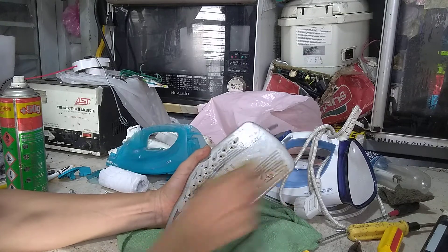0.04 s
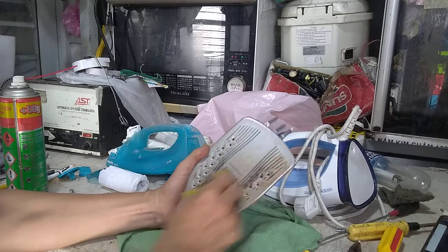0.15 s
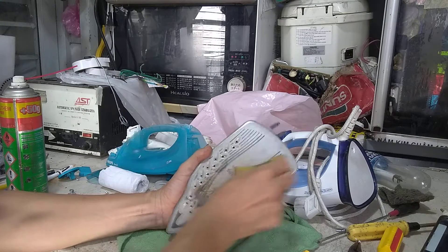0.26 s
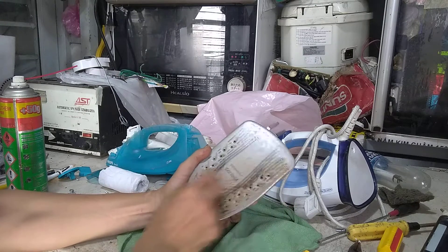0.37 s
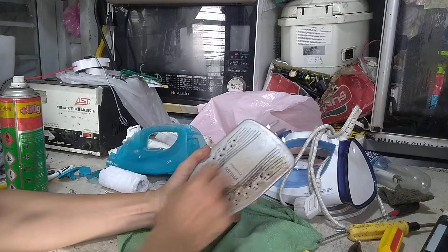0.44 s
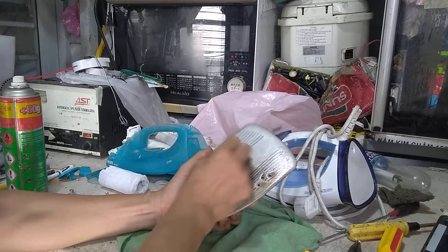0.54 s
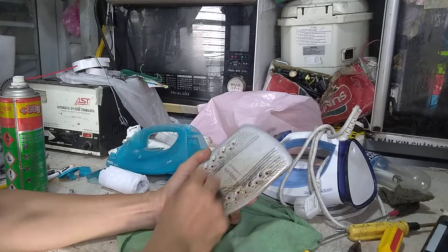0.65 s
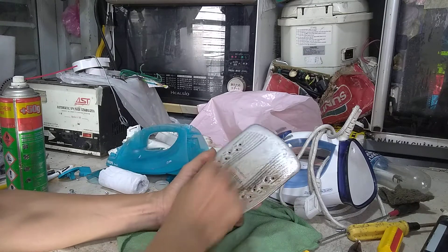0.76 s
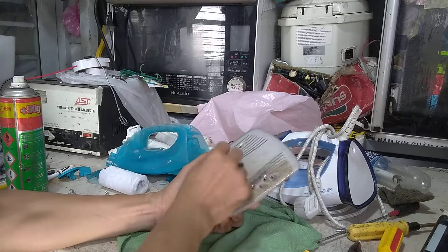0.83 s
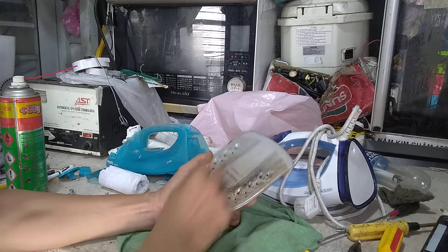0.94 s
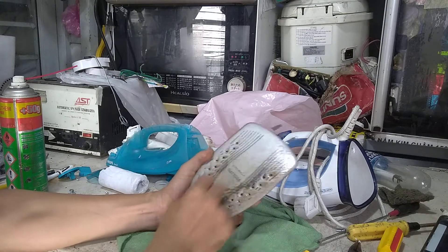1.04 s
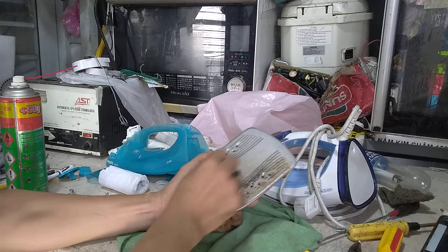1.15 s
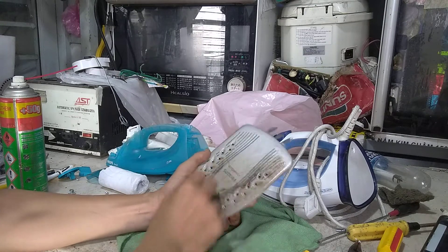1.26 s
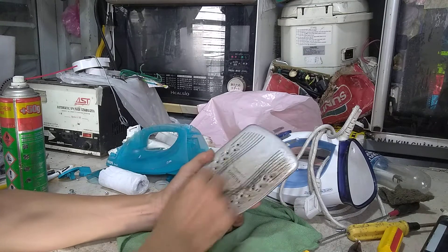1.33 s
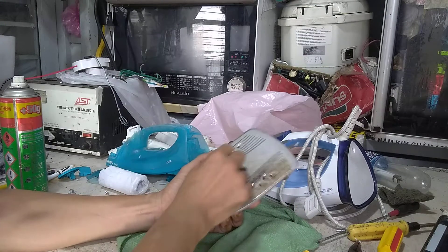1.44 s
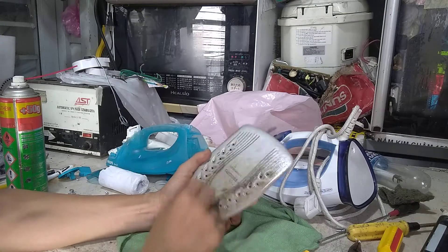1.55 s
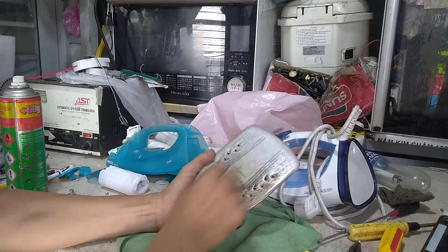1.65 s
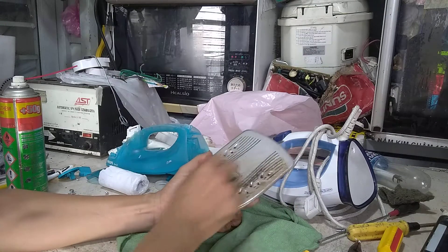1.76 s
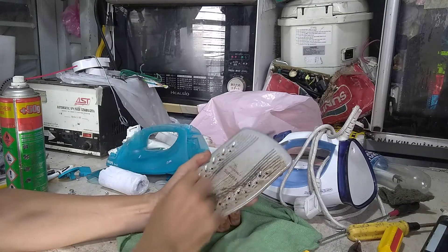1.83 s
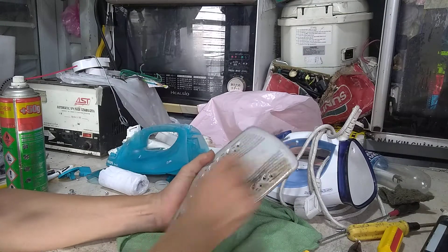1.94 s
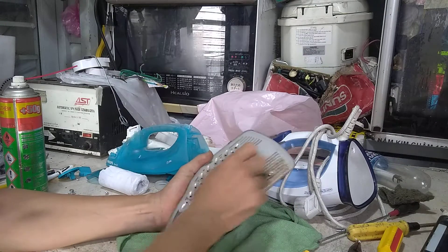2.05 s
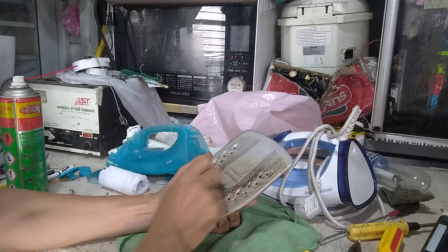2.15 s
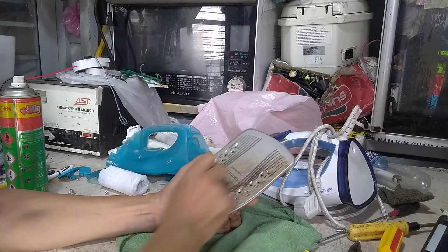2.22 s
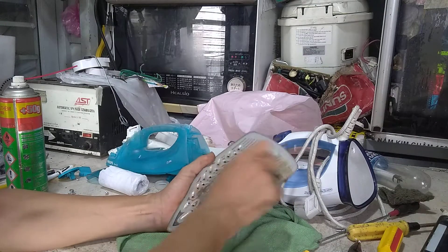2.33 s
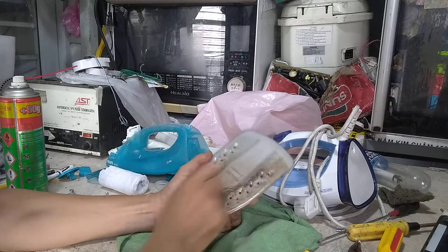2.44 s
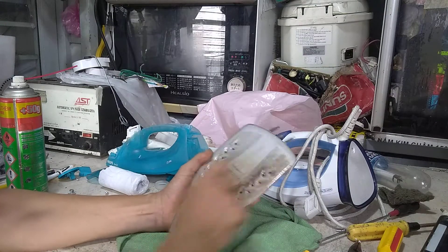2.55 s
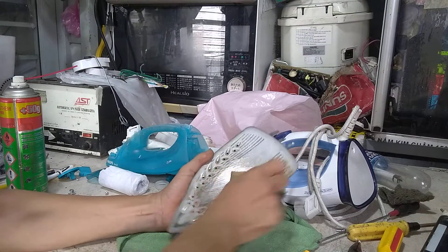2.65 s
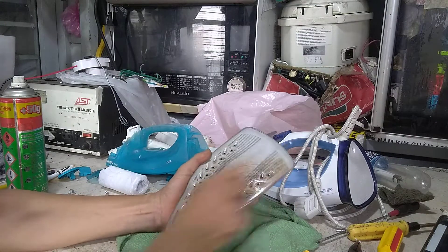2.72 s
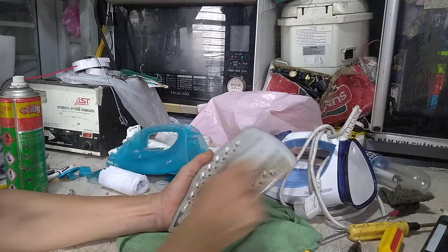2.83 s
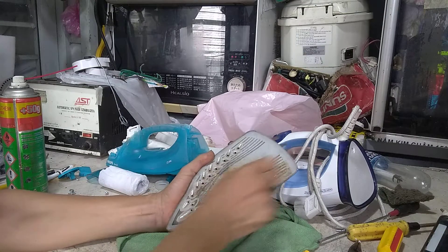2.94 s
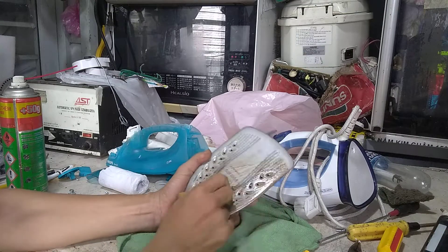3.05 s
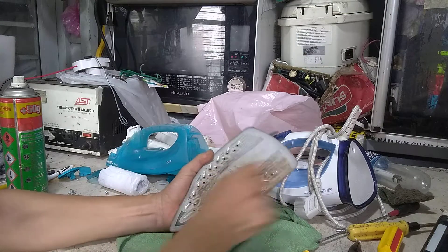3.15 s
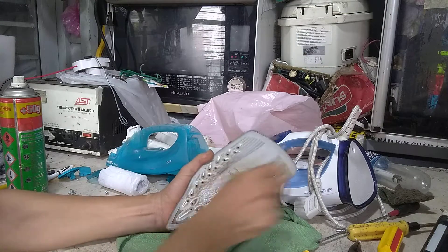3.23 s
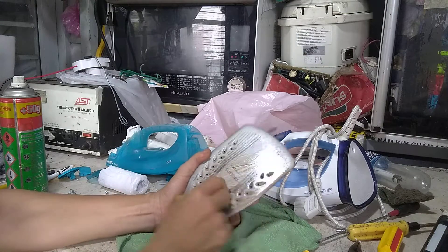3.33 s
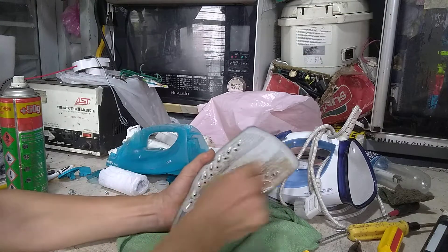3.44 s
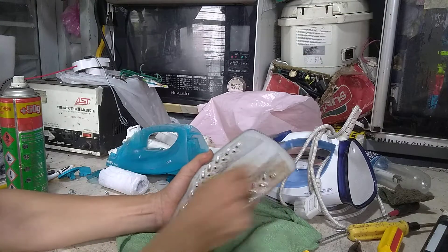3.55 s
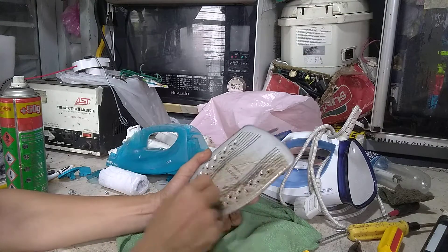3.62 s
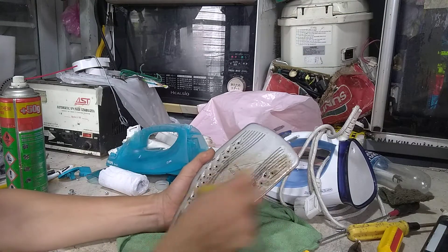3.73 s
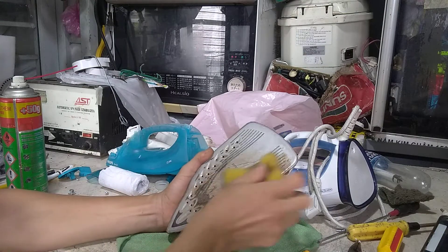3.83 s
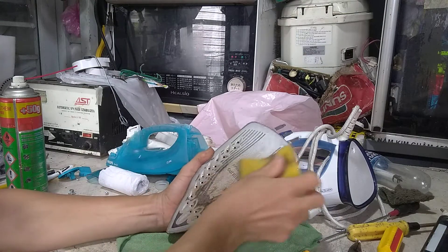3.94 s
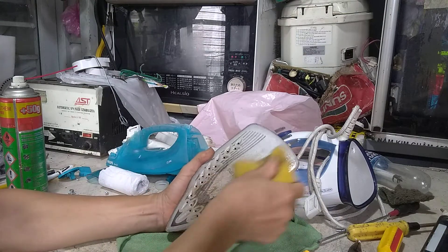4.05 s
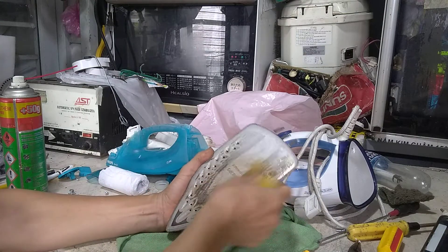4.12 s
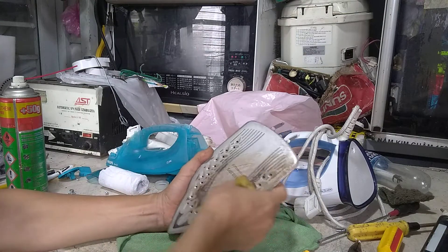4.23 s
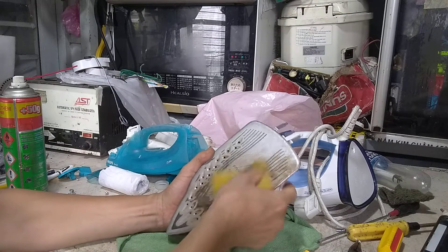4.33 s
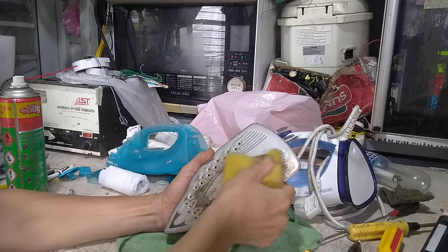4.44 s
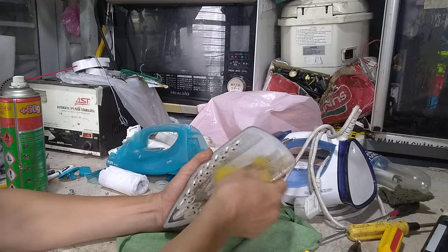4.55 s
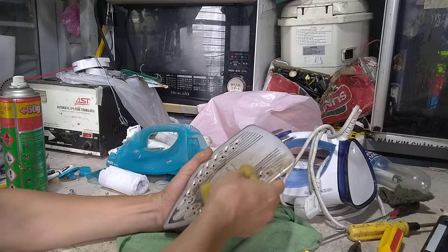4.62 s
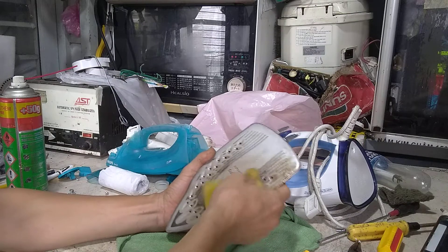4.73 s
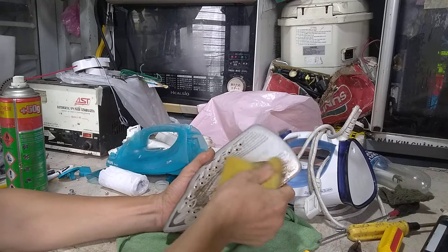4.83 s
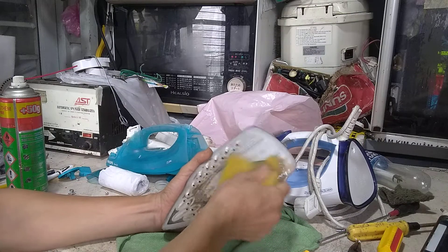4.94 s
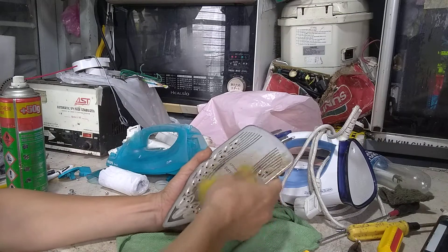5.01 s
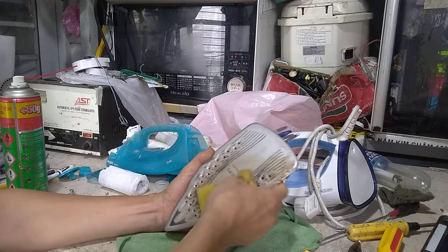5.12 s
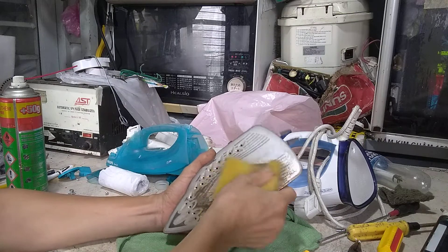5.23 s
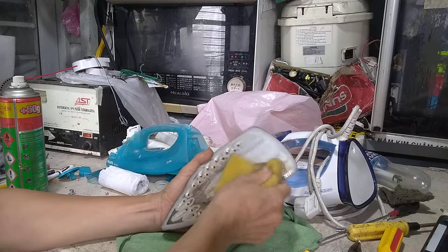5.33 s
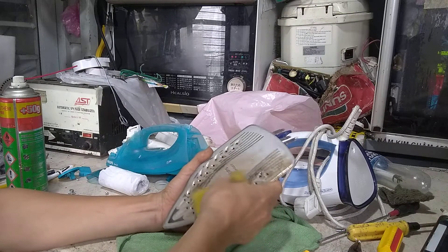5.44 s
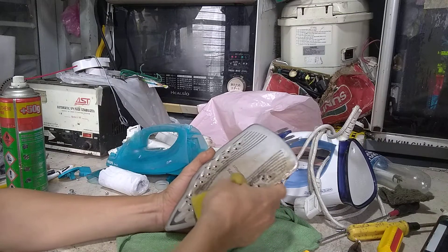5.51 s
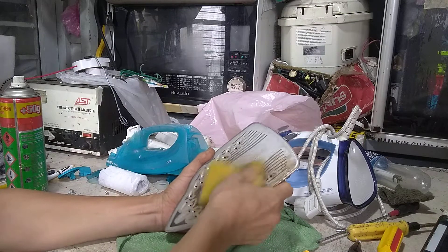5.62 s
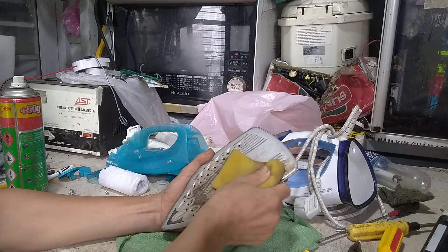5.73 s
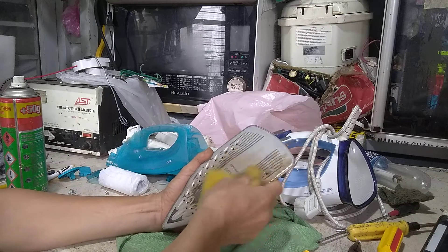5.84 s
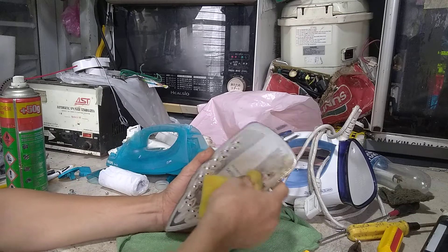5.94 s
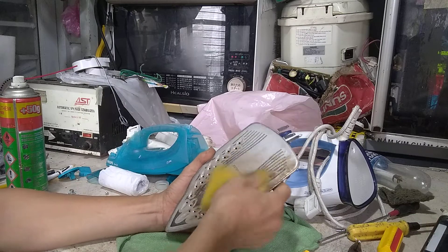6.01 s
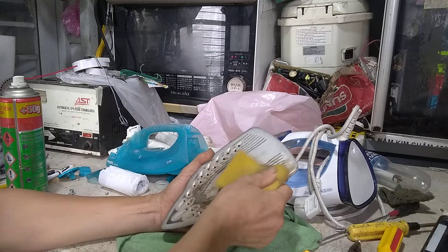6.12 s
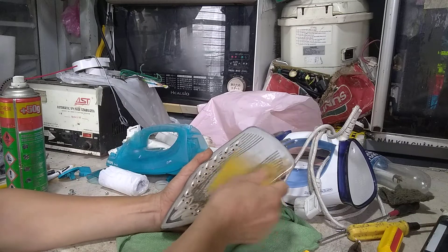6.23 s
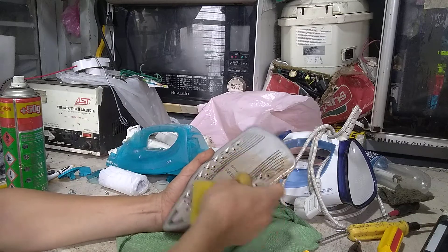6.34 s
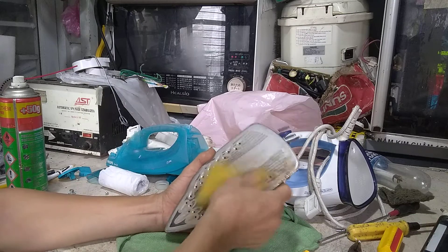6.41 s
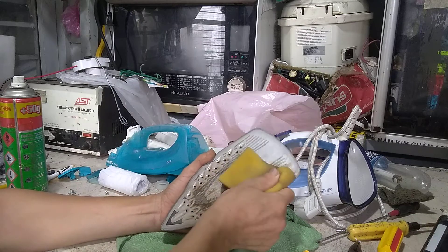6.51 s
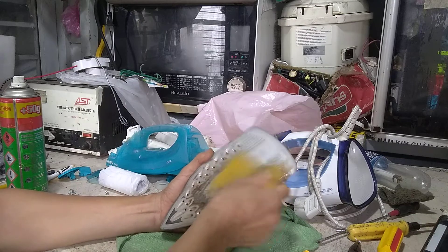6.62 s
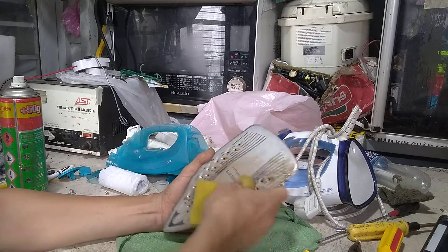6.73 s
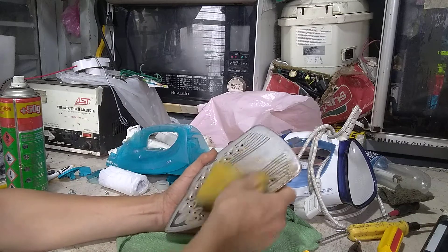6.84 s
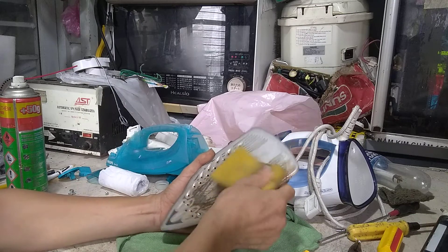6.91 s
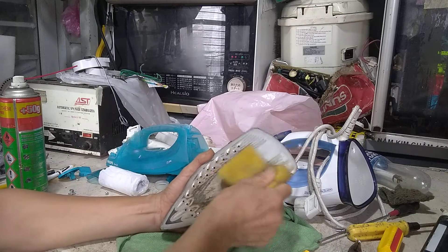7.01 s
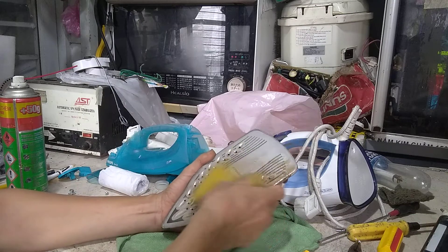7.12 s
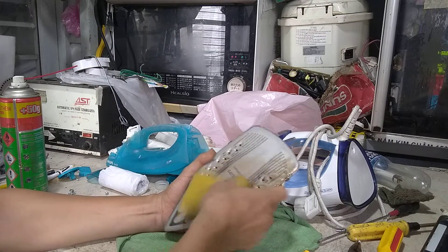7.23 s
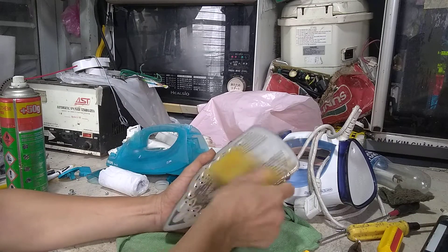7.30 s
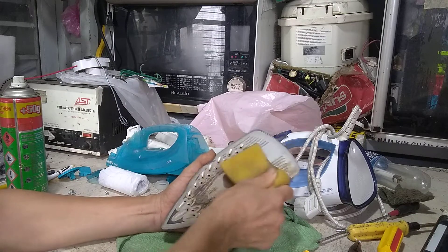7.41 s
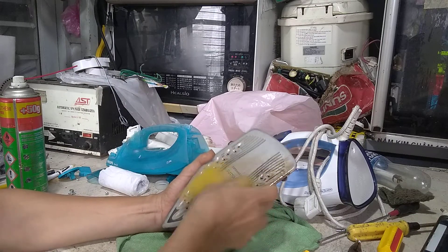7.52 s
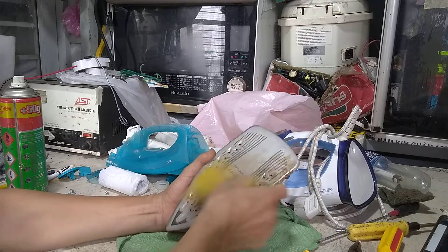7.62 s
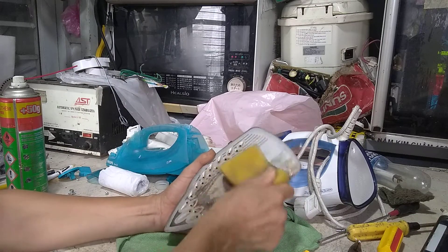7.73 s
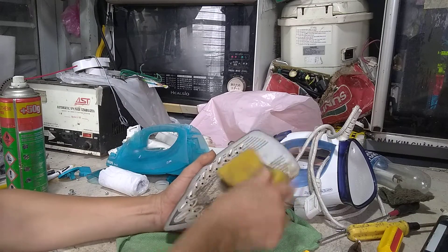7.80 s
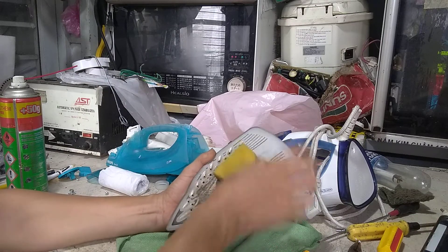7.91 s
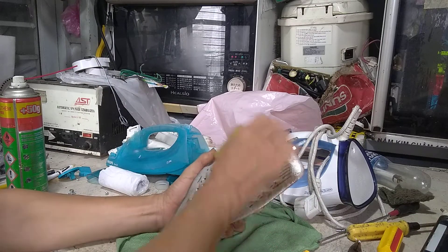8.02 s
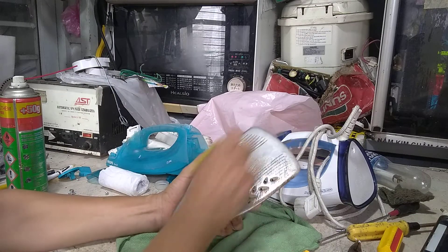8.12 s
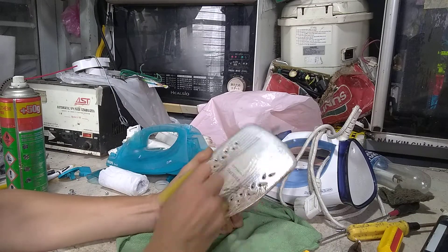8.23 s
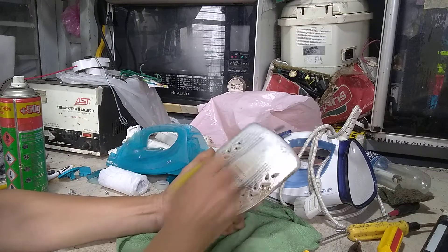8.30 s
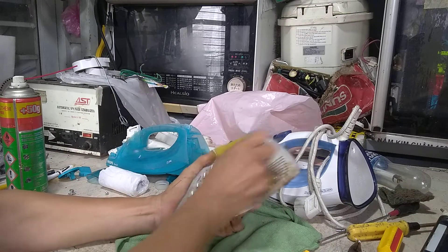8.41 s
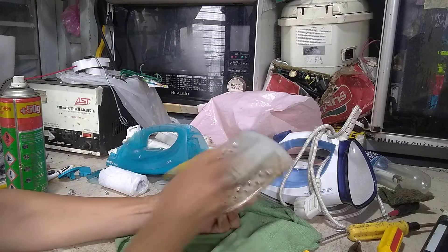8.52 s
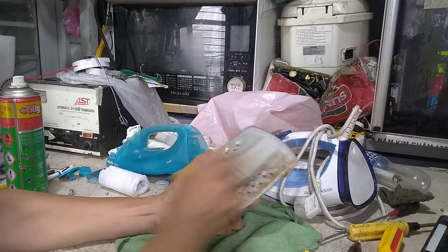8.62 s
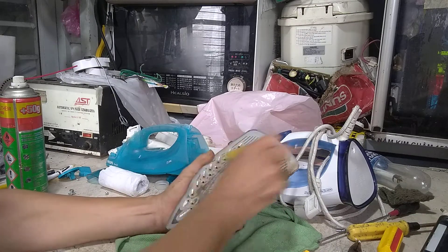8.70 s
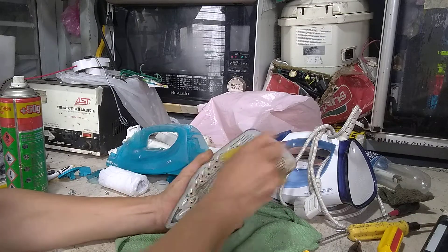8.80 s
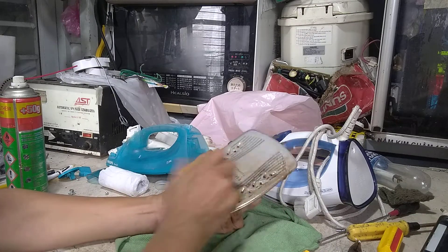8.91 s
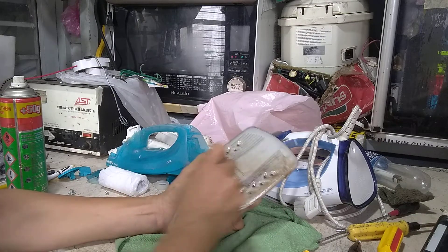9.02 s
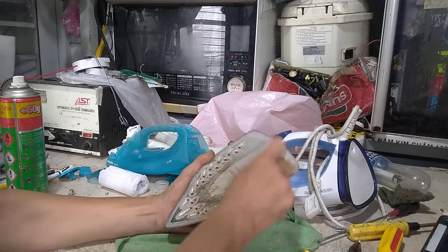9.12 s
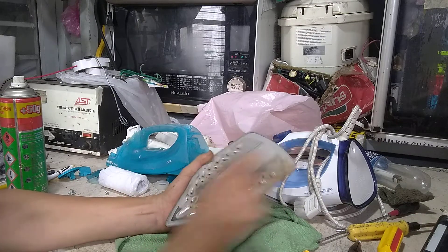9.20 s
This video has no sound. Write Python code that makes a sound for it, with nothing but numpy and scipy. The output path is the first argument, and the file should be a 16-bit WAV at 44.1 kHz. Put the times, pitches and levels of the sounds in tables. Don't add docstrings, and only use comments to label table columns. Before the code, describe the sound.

Close scrubbing of a metal soleplate held in the hand with a wet scouring sponge. Bright, hissy swipes open sharply, then spaced short dabs with faint brushing and one squeak. After a pause come longer, regular back-and-forth soapy strokes with low rumble and dull knocks, then another gap and a few hard dabs. Dry cluttered workbench, very quiet room, small stereo recorder.

```python
import sys
import numpy as np
from scipy import signal
from scipy.fft import rfft, irfft
from scipy.io import wavfile
from scipy.ndimage import uniform_filter1d

SR = 44100
rng = np.random.default_rng(int(sys.argv[2]) if len(sys.argv) > 2 else 0)


def boost(x):
    u = np.asarray(x, float) / 20
    return 10 ** u


def output_pcm(signal):
    pcm = np.clip(np.atleast_2d(signal).T, -1, 1) * 32767
    wavfile.write(sys.argv[1], SR, np.round(pcm).astype(np.int16))


N = 408366
THINNED_BELOW_HZ = 5050


def rms_one(x):
    return x / np.sqrt(np.mean(x ** 2) + 1e-20)


def in_time(rows):
    seconds, *columns = np.transpose(rows)
    return [np.interp(np.arange(N) / SR, seconds, column) for column in columns]


def edge(x, hz, kind, order=2):
    return signal.sosfilt(signal.butter(order, hz, kind, fs=SR, output="sos"), x)


def drift(rate_hz):
    slow = rms_one(edge(rng.standard_normal(N // 32 + 2), 32 * rate_hz, "low"))
    return np.interp(np.arange(N) / 32, np.arange(len(slow)), slow)


def resonate(x, modes, patchy_db=None, sign=-1):
    out = 0
    for k, (hz, width, db) in enumerate(modes):
        radius = np.exp(-np.pi * width / SR)
        feedback = [1, -2 * radius * np.cos(2 * np.pi * hz / SR), radius ** 2]
        gain = boost(db + patchy_db * drift(13)) if patchy_db else boost(db)
        ringing = (1 - radius ** 2) / 2 * signal.lfilter([1, 0, -1], feedback, x)
        out = out + sign ** k * gain * ringing
    return out


def at_ports(draws, alike):
    alike = np.clip(alike, 0, 1)
    return np.sqrt(alike) * draws[0] + np.sqrt(1 - alike) * draws[1:]


def catches(per_s, spread_db, count=1):
    sizes = boost(spread_db * np.minimum(rng.exponential(1, (count, N)), 5))
    sizes = sizes * rng.choice([-1, 1], (count, N))
    return rms_one(sizes * (rng.random((count, N)) < per_s / SR))


def linger(level_db, db_per_s):
    ramp = db_per_s * np.arange(N) / SR
    return np.maximum.accumulate(level_db + ramp) - ramp


def landing(t, bite, graze_db):
    t = np.minimum(t, 0)
    return np.maximum(bite * t, graze_db + 548 * t)


def layer_offsets(thud_db, rumble_db, drag_db):
    return np.array([[0], [thud_db], [rumble_db], [drag_db]])


# start in seconds, length in seconds, scratch in dB, then rumble and drag in dB re the
PULLS = [
    (4.789, .11, -34.5, -23.5, -24),
    (5.197, 0.11, -33.5, -16.5, -24),
    (5.603, 0.15, -32.5, -7, -25),
    (6.031, .148, -36, -15, -21.5),
    (6.392, 0.017, -35, -20, -18.5),
    (6.421, 0.14, -32, -19, -21.5),
    (6.834, .15, -32.5, -18.5, -23),
    (7.285, 0.13, -32, -20.5, -24),
    (7.684, 0.0845, -32.5, -18, -21.5),
]
PUSHES = [
    (5.029, 0.06, -35.5, -17, -24.5),
    (5.426, 0.0853, -36, -7, -19.5),
    (5.861, 0.053, -34, -10.5, -23),
    (6.293, 0.055, -34.5, -17, -22),
    (6.665, .075, -35.5, -14, -26),
    (7.104, 0.096, -36.5, -15.5, -20),
    (7.521, 0.0684, -36, -17, -22.5),
]
DABS = [
    (1.707, 0.027, -40, -19, -21.5),
    (1.97, 0.031, -43, -15, -14),
    (2.328, 0.046, -37.5, -17, -18.5),
    (2.622, 0.054, -38, -15.5, -12),
    (2.88, 0.053, -38.5, -17, -14.5),
    (3.172, 0.065, -37, -20, -16),
    (4.451, 0.032, -43.5, -25, -21.5),
    (8.253, 0.0286, -34.5, -11, -14),
    (8.567, 0.027, -33.5, -7.5, -4),
    (8.662, 0.045, -32, -18.5, -15),
]
SWIPES = [
    (.094, 0.059, -38.5, -23.5, -17.5),
    (.212, 0.027, -36, -28, -11),
    (.359, 0.086, -37.5, -24.5, -17),
    (3.347, 0.034, -46, -18, -17.5),
    (4.356, 0.067, -38, -20, -24.5),
    (4.597, 0.071, -38.5, -25.5, -22.5),
    (8.335, 0.046, -32.5, -14.5, -20.5),
]
# bite in dB per second, graze before it in dB, share of the stroke where speed
# peaks, speed loss at start and at end in dB, lift-off in dB per second, hand thud in dB re the scratch.
PULL = (2602, -40, 0.3248, -7, -6.5, 950, -21.5)
PUSH = (1495, -13.5, 0.33, -2, -6, 940, -20)
DAB = (1597, -20, .5, -2, -5, 944, -18)
SWIPE = (1700, -13, -1.1, -6.5, -2, 995, -21)
LEAN_DB = [0.5, 4, 3, 3.5]


def strokes(t):
    power = 0
    for rows, manner in ((PULLS, PULL), (PUSHES, PUSH), (DABS, DAB), (SWIPES, SWIPE)):
        bite, graze_db, peak, start_db, end_db, lift, thud_db = manner
        for start, length, db, rumble_db, drag_db in rows:
            along = np.clip((t - start) / length, 0, 1)
            after = np.maximum(t - start - length, 0)
            slowness = np.interp(along, [0, np.clip(peak, .05, .95), 1], [1, 0, 1]) ** 2
            speed_db = slowness * np.where(along < peak, start_db, end_db)
            trail_db = -29 - 350.5 * after
            ends_db = landing(t - start, bite, graze_db) + np.maximum(-lift * after, trail_db)
            lean_db = np.outer(LEAN_DB, along - .5)
            layers = layer_offsets(thud_db, rumble_db, drag_db)
            power = power + boost(2 * (db + speed_db + ends_db + lean_db + layers))
    return power


# start
# in seconds, seconds to fade by 30 dB, scratch in dB, then rumble and drag in dB re the scratch.
FLICKS = [(.245, 0.0528, -28.5, -29, -8.5), (.285, 0.05, -40.5, -28, -16), (0.521, 0.006, -36, -22, -17.5),
          (1.74, 0.0779, -45.5, -20.5, -21.5), (2.003, 0.08, -49, -18, -21), (2.157, 0.15, -45.5, -14, -20),
          (2.441, 0.23, -47, -19, -21), (2.791, 0.24, -46, -15, -14), (3.472, 0.0623, -34.5, -29.5, -19),
          (5.335, .25, -68.5, 12, -12), (5.55, 0.6, -68.5, 8.5, -9.5), (5.78, 0.6, -67.5, 12.5, -9.5),
          (8.383, 0.18, -40.5, -10, -22), (8.713, 0.13, -39.5, -14.5, -21.5)]


def flicks(t):
    power = 0
    for start, fade, db, rumble_db, drag_db in FLICKS:
        shape_db = landing(t - start, bite=2199.5, graze_db=-23.5) - 30 * np.maximum(t - start, 0) / fade
        power = power + boost(2 * (db + shape_db + layer_offsets(-21.5, rumble_db, drag_db)))
    return power


# peak in seconds, scratch in dB, swell in seconds,
# fade in seconds (both over 12 dB).
BRUSHES = [(0.0, -61.5, .03, .03), (.07, -62, 0.0275, .03), (.505, -50.5, 0.039, .03),
           (.57, -53.5, 0.053, .015), (.712, -59, 0.128, .05), (.808, -56.5, .025, .09),
           (1.01, -57.5, 0.0875, .05), (1.096, -56, 0.0164, .1), (1.31, -64.5, 0.12, .03),
           (1.41, -58.5, .04, .07), (1.588, -57.5, 0.077, .05), (1.695, -58, 0.042, .03),
           (1.87, -62.5, 0.064, .06), (2.31, -63, 0.032, .03), (2.605, -60.5, 0.031, .03),
           (2.78, -60, 0.12, .03), (2.86, -61, 0.0091, .03), (3.075, -59.5, 0.099, .035),
           (3.335, -65, 0.1, .03), (3.46, -67, 0.06, .03), (4.19, -58.5, 0.065, 0.067),
           (2.148, -57.5, .03, 0.023), (2.425, -60, 0.036, 0.022), (4.57, -57, 0.022, .04),
           (8.18, -62.5, .03, .1), (8.24, -59.5, 0.082, .03), (8.5, -63, 0.15, .2),
           (8.938, -64.5, 0.085, .07), (9.095, -60, 0.0304, .2), (9.255, -57, 0.06, .03)]


def brushes(t):
    power = 0
    for peak, db, swell, fade in BRUSHES:
        away = np.where(t < peak, (peak - t) / swell, (t - peak) / fade)
        power = power + boost(2 * (db - 12 * away ** 1.8 + layer_offsets(-26, -26, -21.5)))
    return power


def pad():
    t = np.arange(0, N / SR, .001)
    power = boost(-200) + strokes(t) + flicks(t) + brushes(t)
    return in_time(np.vstack([t, 10 * np.log10(power)]).T)


# frequency in Hz, width in Hz, level in dB.
SHEEN = [(5114, 640, 9.5), (5670, 91, 3), (6200, 840, 0.5), (7185, 1020, 3), (8132, 1200, -2.5),
         (9164, 480, 1), (9840, 500, -11), (11164, 1300, -7.5), (14670, 730, -11)]
# time in seconds, level above 8 kHz in dB.
FINE = [(0, 4), (.5, -0.5), (1.6, -1.5), (2.2, 1.5), (3.5, 1), (4.5, 2.5), (7.8, 3.5), (8.4, -6),
        (9.2, -6.5)]
# time in seconds, level in dB.
SCRATCH_DIP = [(1.706, 0), (1.709, -8), (1.726, -8), (1.736, 0)]


def scratch(level_db):
    fibres = at_ports(catches(14000, spread_db=2.5, count=3), alike=.58)
    bright = .42 * fibres + resonate(fibres, SHEEN, patchy_db=2.5, sign=1)
    fine = edge(bright, 8500, "high", order=1)
    bright = bright + (boost(in_time(FINE)[0]) - 1) * fine
    level_db = level_db + in_time(SCRATCH_DIP)[0] + 0.65 * drift(44)
    return boost(level_db) * rms_one(edge(bright, THINNED_BELOW_HZ, "high"))


# frequency in Hz, width in Hz, level in dB.
DRAG = [(1065, 570, -12), (1607, 540, -6.5), (2130, 540, -8), (2806, 400, -2.5), (3630, 650, -2.5),
        (4570, 500, -2)]


def drag(level_db, slips):
    body = resonate(at_ports(slips, alike=.9), DRAG, patchy_db=3)
    return boost(linger(level_db, 700) + 1.5 * drift(30)) * rms_one(edge(body, 1100, "high"))


# frequency in Hz, width in Hz, level in dB.
THUD = [(62, 87, -10), (108, 95, -5), (208.1, 48.6, 3.5)]
RUMBLE = [(301, 47, 0), (409, 58.4, 2.5), (505, 270, -8)]
# time in seconds, peak level in dB.
KNOCKS = [
    (5.497, -9),
    (5.75, -12),
    (8.271, -31),
    (8.564, -16),
    (8.594, -16),
]


def rumble(thud_db, rumble_db, slips):
    pushes = np.zeros(N)
    for s, db in KNOCKS:
        pushes[round(s * SR)] = boost(db + 19.5)
    slips = at_ports(slips, alike=0.33)
    plate = edge(edge(resonate(slips, RUMBLE), 230, "high", order=3), 800, "low", order=4)
    hand = edge(resonate(slips[::-1], THUD), 350, "low")
    plate = boost(linger(rumble_db, 270.5) + 1.25 * drift(28)) * rms_one(plate)
    hand = boost(linger(thud_db, 450) + 0.5 * drift(8.9)) * rms_one(hand)
    knocks = resonate(edge(pushes, 630, "low"), RUMBLE + THUD[2:])
    return plate + hand + knocks


# time in seconds, peak level in dB, ring length as a factor.
TICKS = [(0.2418, -21, 1.44), (0.5217, -22.5, 0.6), (0.5846, -44.5, 0.75), (1.709, -26.5, 1.3),
         (2.8794, -28.5, 1.5), (2.9145, -25.5, 0.85), (3.4695, -14.5, 0.23), (3.4754, -35, 0.57),
         (4.4493, -26.5, 0.61), (6.0307, -30.5, 1.6), (6.3909, -19.5, 0.31), (6.4004, -46, 0.91),
         (6.4507, -25, 0.88), (6.8372, -30.5, 1.6), (7.686, -40, 1.1), (8.3094, -50.5, 1.3),
         (8.5444, -50, 0.69)]
# frequency in Hz, level in dB, time to fall 60 dB in seconds.
STRUCK = [(2740, -9.5, 0.06), (5063, 3, 0.08), (5800, -1, 0.031), (6090, 2.5, 0.065), (7830, 2, 0.06),
          (7850, -26, 0.029), (10700, -34.5, 0.18), (12000, -94, 0.067)]


def ticks():
    out, t = np.zeros(N + SR), np.arange(SR // 5) / SR
    for s, db, stretch in TICKS:
        hit = 0.97 * rng.standard_normal(len(t)) * boost(-60 * t / (0.0346 * stretch))
        for hz, mode_db, t60 in STRUCK:
            ring_db = mode_db - 10 + rng.normal(0, 2.6) - 60 * t / (t60 * stretch)
            hit += boost(ring_db) * np.sin(2 * np.pi * hz * t)
        out[round(s * SR):][:len(t)] += boost(db - 5.5) * hit
    return out[:N]


# start in seconds, length in seconds, pitch in Hz, level in dB.
SQUEAKS = [
    (1.089, 0.013, 6200, -59),
    (1.36, .012, 6200, -63),
    (1.646, 0.0089, 6200, -57.5),
    (1.658, 0.0055, 6200, -54),
    (1.691, 0.0049, 6200, -64),
    (1.7097, 0.012, 6200, -27),
]


def squeaks():
    out, waver = np.zeros(N), drift(430)
    for s, length, hz, db in SQUEAKS:
        t = np.arange(N) / SR - s
        shape = np.clip(t / 0.00064, 0, 1) * np.clip((length - t) / 0.0043 + 1, 0, 1)
        out += boost(db + 4.4 * waver) * shape * np.sin(2 * np.pi * hz * t + 0.24 * waver)
    return out


def bench(x, echo_db, t60):
    t = np.arange(SR // 4) / SR
    scatter = rng.standard_normal((2, len(t))) * boost(-60 * t / t60) * (t > .0007)
    scatter /= np.sqrt(np.sum(scatter ** 2, axis=1, keepdims=True))
    return x + boost(echo_db) * signal.fftconvolve(x[None], scatter, axes=1)[:, :N]


# frequency in Hz, level in dB per Hz.
ROOM = [(25, -24), (60, -11), (110, -8.5), (220, -0.5), (600, -7.5), (1300, -13.5), (3000, -16),
        (7000, -18), (11000, -23.5), (14000, -26)]


def room():
    hz = np.maximum(np.fft.rfftfreq(N, 1 / SR), 1)
    room_hz, room_db = np.transpose(ROOM)
    colour = boost(np.interp(np.log(hz), np.log(room_hz), room_db))
    alike = np.interp(hz, [0, 700, 1200, 4000, 8000], [.3, .4, .8, .7, .4])
    noise = at_ports(rfft(rng.standard_normal((3, N))), alike)
    return boost(-66.8) * rms_one(irfft(colour * noise, N))


def scene():
    scratch_db, thud_db, rumble_db, drag_db = pad()
    slips = catches(4000, spread_db=2.5, count=3)
    metal = bench(ticks(), echo_db=0, t60=0.06) + squeaks()
    steep = signal.cheby2(10, 24, THINNED_BELOW_HZ - 150, "high", fs=SR, output="sos")
    high = signal.sosfilt(steep, scratch(scratch_db) + metal) * boost([[2.5], [1.2]])
    escaped = boost(-11) * edge(edge(metal, 2500, "high"), THINNED_BELOW_HZ, "low")
    middle = drag(drag_db, slips) * boost(4)
    low = rumble(thud_db, rumble_db, slips) * boost([[5], [-2]])
    return high + escaped + middle + low + room()


# time in seconds, gain in dB.
MAKE_UP = [(3.55, 0), (3.75, 1.5), (4.08, 1.5), (4.15, 0), (7.8, 0), (7.9, 1.5), (8.12, 1.5), (8.2, 0)]
# start in seconds, end in seconds, threshold in dB, creep in seconds.
PAUSES = [
    (1.347, 1.352, -62, .008),
    (3.85, 4.085, -64.8, .75),
    (7.95, 8.07, -65, .3),
]


def gate(x, ratio=8):
    rest_db = -76
    x = x * boost(in_time(MAKE_UP)[0])
    t, threshold_db = np.arange(N) / SR, rest_db + .7 * drift(60)
    for start, end, db, creep in PAUSES:
        inside = np.minimum((t - start) / creep, (end - t) / min(creep, .04))
        threshold_db += (db - rest_db) * np.clip(1 + inside, 0, 1)
    level_db = 10 * np.log10(uniform_filter1d(np.mean(x ** 2, axis=0), size=90) + 1e-12)
    gain_db = np.clip(ratio * (level_db - threshold_db), -18, 0)
    return x * boost(uniform_filter1d(gain_db, size=30))


def thin_spectrum(left, right, weak_db=-3.2, sparse_db=1.2):
    hz, _, lines = signal.stft([left + right, left - right], SR, "cosine", nperseg=2048)
    power = np.abs(lines) ** 2
    band = uniform_filter1d(power, size=12, axis=1)
    around = band.mean(axis=0)
    loud = np.clip((10 * np.log10(power.sum(axis=(0, 1)) + 1e-12) + 55) / 15, 0, 1)
    ragged_db = np.repeat(rng.normal(0, 3.5, (2, 129, len(loud))), 8, axis=1)[:, :len(hz)]
    sudden = np.diff(loud, prepend=0) * np.roll(loud, -1) > .45
    row_hz = hz[:, None]

    faint = (power < band * boost(2 * (sparse_db - 9 * (1 - loud)))) & (row_hz > 2400)
    faint |= (row_hz > 4700) & (ragged_db > 3.5) & (loud > .5)
    limit_db = 2 * weak_db + ragged_db - 9 * sudden + 2.5 * (row_hz > 3000)
    weaker = (band < around * boost(limit_db)) & (row_hz < THINNED_BELOW_HZ)
    starved = (hz > 900) & (hz < [[THINNED_BELOW_HZ], [5700]])
    gap_band = (hz > [[13300], [12150]]) & (hz < [[13700], [12450]])
    gap_open = drift(14)[::1024][np.arange(len(loud)) % (N // 1024)] > .5
    top_gap = gap_band[:, :, None] & gap_open

    kept = ~((weaker | faint) & starved[:, :, None] | top_gap)
    mid, side = signal.istft(lines * kept, SR, "cosine", nperseg=2048)[1][:, :N]
    return np.array([mid + side, mid - side]) / 2


def roll_off(x):
    return signal.sosfilt(signal.butter(12, 15460, fs=SR, output="sos"), x)


def record(dry):
    left, right = gate(dry)
    late = np.exp(-2j * np.pi * np.fft.rfftfreq(N, 1 / SR) * .00044)
    both = thin_spectrum(left, -irfft(rfft(right) * late, N))
    mix = signal.sosfilt(signal.cheby2(16, 55, 14600, fs=SR, output="sos"), both)
    return roll_off(mix)


dry = scene()
out = record(dry)
output_pcm(out)
```